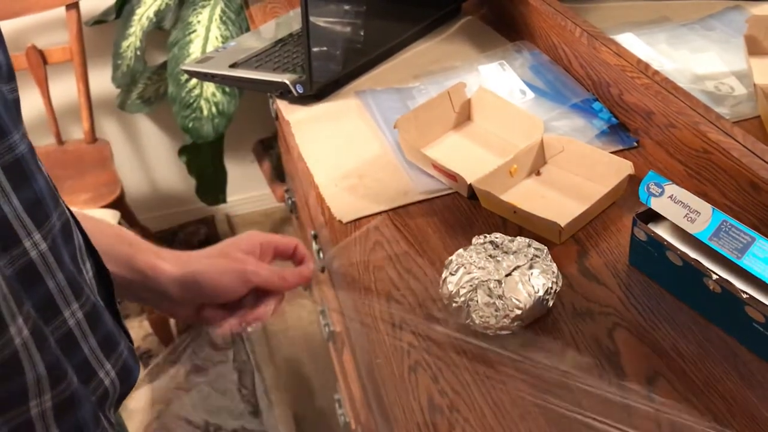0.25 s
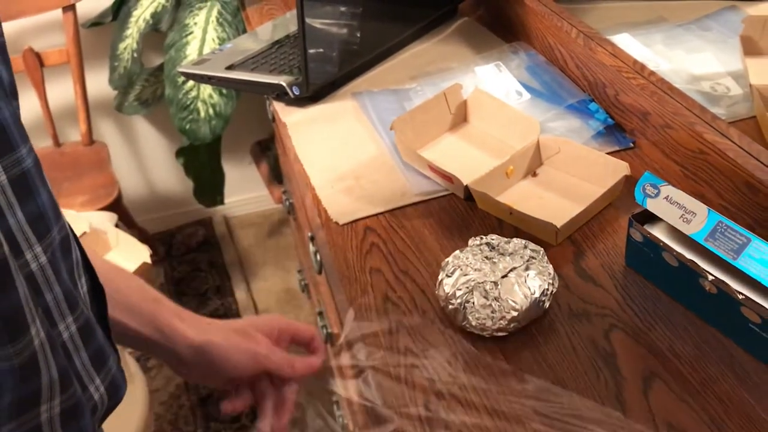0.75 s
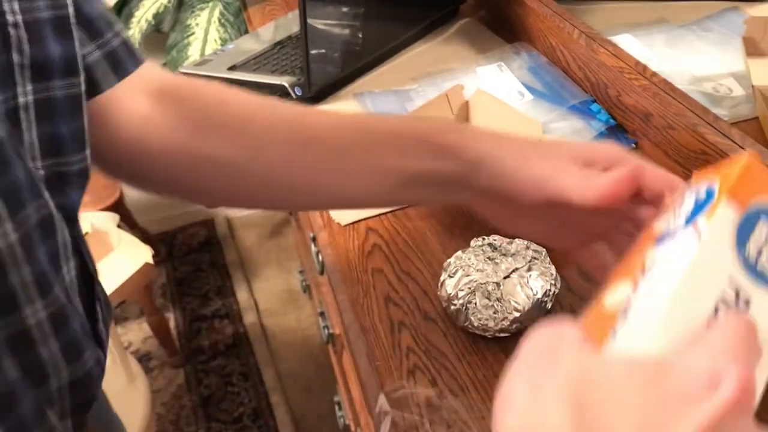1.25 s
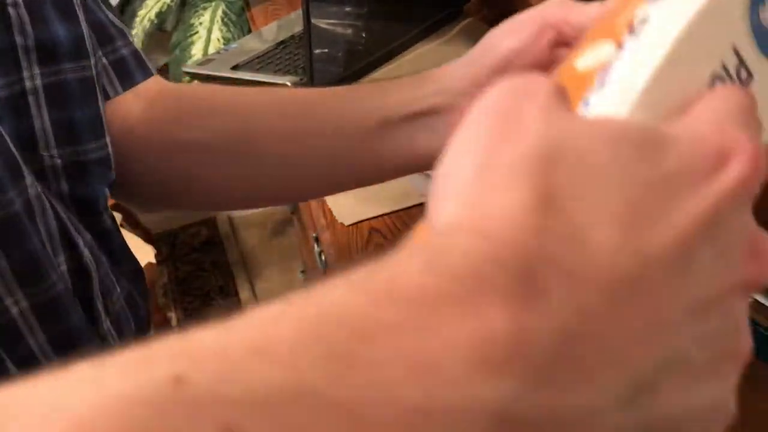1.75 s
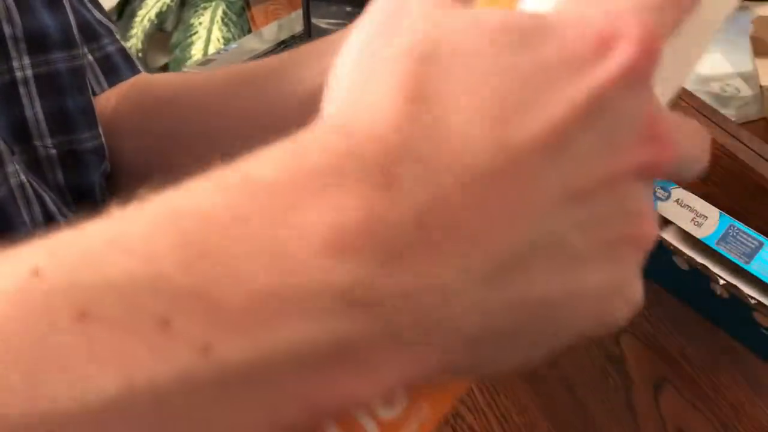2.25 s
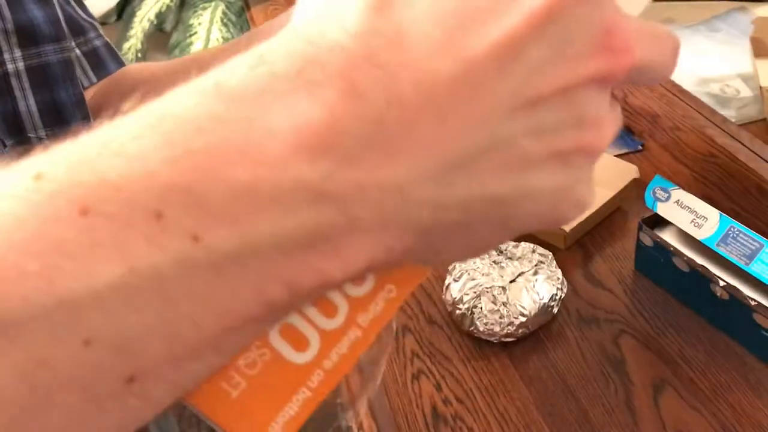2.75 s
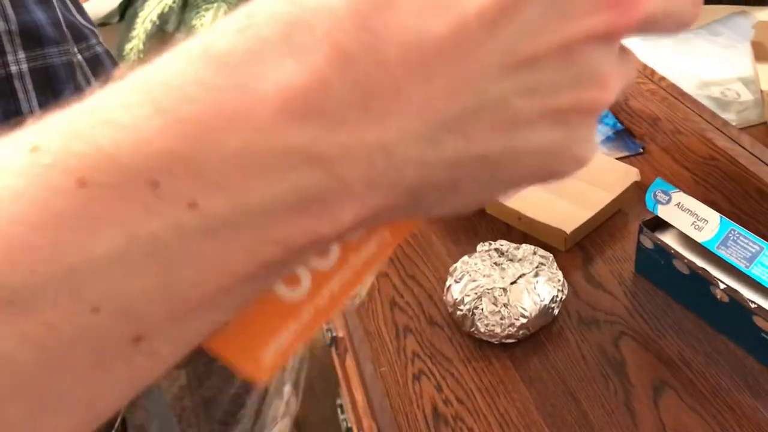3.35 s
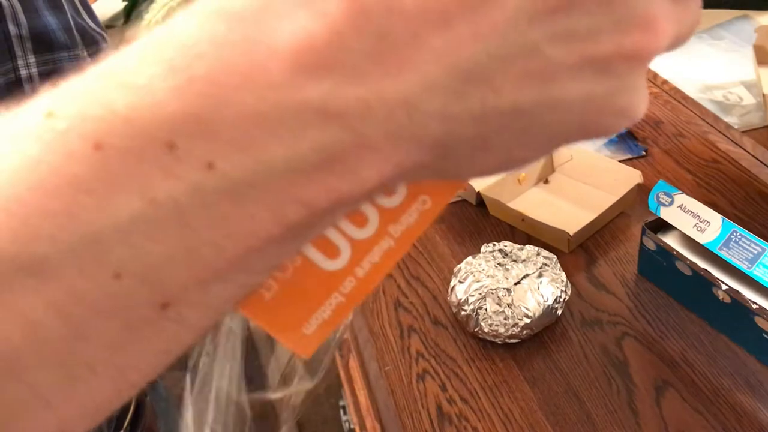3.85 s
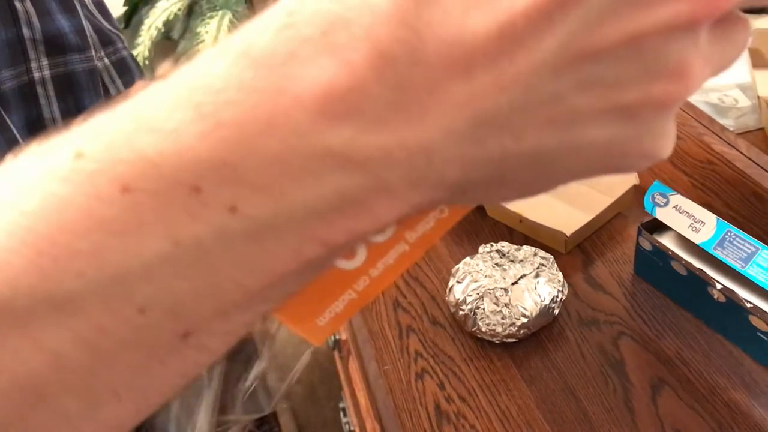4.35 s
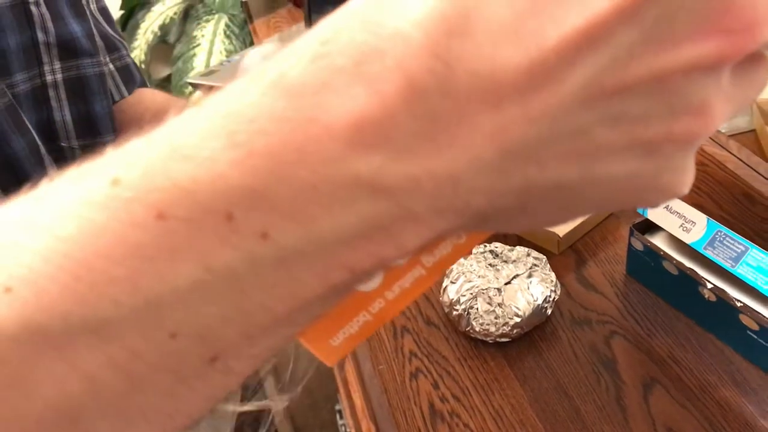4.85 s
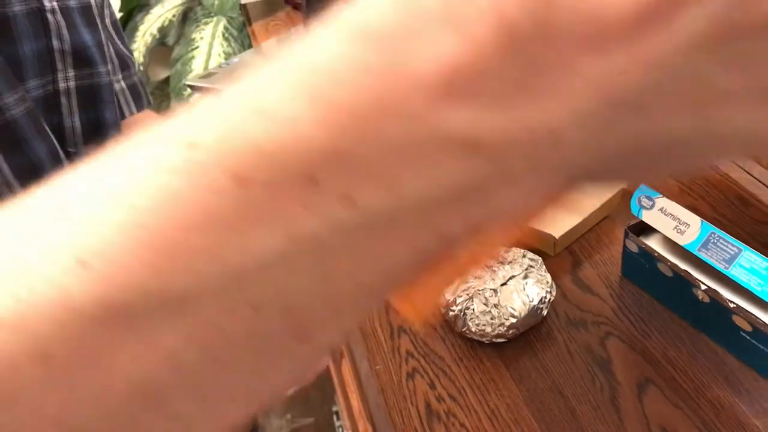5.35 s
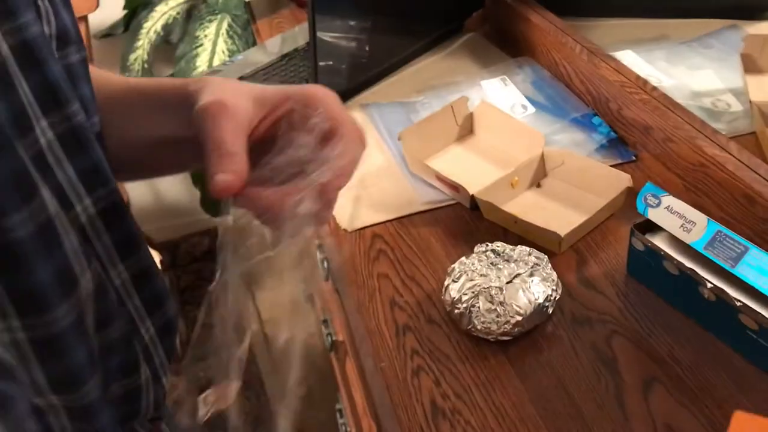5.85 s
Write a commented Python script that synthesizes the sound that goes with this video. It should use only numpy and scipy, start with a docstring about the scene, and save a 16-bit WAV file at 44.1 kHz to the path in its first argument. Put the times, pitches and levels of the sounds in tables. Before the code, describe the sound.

In a quiet room with little echo, a light cardboard knock leads into faint crackling of plastic wrap, heard close up. A handful of brief rips follow as the wrap is pulled across the teeth of its box, with crisp ticks and snaps between them. Last and loudest come a sharp knock and a quick clatter of the box on a wooden table, over a faint low rumble.

```python
"""Tearing cling film from its box

Close by in a furnished room, cling film is drawn from a cardboard box and torn along the toothed edge
in short tugs. Tiny slips in the film make it rip, rustle and snap; the card panels and the air inside
ring along. The box is knocked on a wooden table, which booms. Mains hum lies under the room tone."""
import sys
import numpy as np
from scipy import signal
from scipy.fft import rfft, irfft, next_fast_len
from scipy.io import wavfile
from scipy.ndimage import uniform_filter1d, map_coordinates

SR = 44100
rng = np.random.default_rng(int(sys.argv[2]) if len(sys.argv) > 2 else 0)


def digitize_waveform(pressure):
    """Quantize a signal to 16-bit integers and store it at the path in sys.argv[1].

    Rows of a 2-D input are taken as channels; values are limited to [-1, 1].
    """
    field = np.atleast_2d(pressure).T
    bounded = np.clip(field, -1, 1)
    quanta = np.round(bounded * 32767).astype(np.int16)
    wavfile.write(sys.argv[1], SR, quanta)


N = 269010
TIME = np.arange(N) / SR


# Tugs along the teeth: (start [s], level [dB], attack [s], hold [s], box send [dB], hollow send [dB])
TUG_CUES = [(2.451, -35.5, 0.017, 0.036, -10, -12.5), (2.973, -38, 0.026, 0.031, -5, -22),
            (3.411, -43, 0.059, 0.033, -7.5, -20.5), (4.172, -35, 0.012, 0.013, -5.5, -13.5),
            (5.276, -44.5, 0.036, 0.0021, -0.5, 0)]

def tugs():
    """The teeth rip the film in a dense rattle of slips. Returns the box, film and hollow feeds."""
    swell_db, sag_db_per_s, release_db_per_s = 23.5, 94, 417
    slips = patchy(crackle(spread_db=3.5, clump_db=3.5, clumps_per_s=300), depth_db=1.0)
    feeds = np.zeros((3, N))
    for start, db, attack_s, hold_s, box_db, hollow_db in TUG_CUES:
        since_top = TIME - start - attack_s
        rip_db = db - swell_db * np.minimum(since_top / attack_s, 0) ** 2
        rip_db -= sag_db_per_s * np.clip(since_top, 0, hold_s)
        rip_db -= release_db_per_s * np.maximum(since_top - hold_s, 0)
        feeds += amp([[box_db], [0], [hollow_db]]) * amp(rip_db) * slips * (TIME >= start)
    return feeds


# Film snaps and box knocks: (time [s], box level [dB], focus [Hz], film level [dB], hollow level [dB])
SNAP_CUES = [(.007, -31.5, 1050, -44, -33), (.051, -35.5, 820, -49.5, -46), (.225, -48, 2570, -74, -51.5),
             (.395, -50.5, 1030, -70, -56), (.534, -56, 945, -50, -49), (.885, -42, 1100, -66, -58),
             (1.029, -56.5, 1180, -59, -53), (1.435, -55, 1260, -69, -77), (1.649, -55.5, 1110, -63, -68),
             (1.743, -58, 1130, -63, -79), (1.812, -39, 1020, -34, -35.5), (1.946, -59, 1800, -61, -68),
             (1.977, -49.5, 1340, -55, -53), (2.196, -56, 3010, -51, -62), (2.476, -52, 2430, -28.5, -65),
             (2.493, -45, 2480, -28.5, -54), (2.533, -51, 1230, -41, -73), (2.685, -71, 3250, -46.5, -76),
             (2.71, -39.5, 950, -52, -53), (2.799, -47.5, 800, -58, -60), (2.855, -55.5, 842, -52.5, -73),
             (2.992, -38.5, 2070, -53, -44), (3.031, -59, 2000, -40, -45), (3.144, -56, 3020, -63, -61),
             (3.163, -57, 2960, -46, -52.5), (3.319, -50.5, 1230, -76, -60), (3.422, -44.5, 1100, -47, -54),
             (3.438, -45, 1210, -42, -69), (3.456, -37, 1790, -52, -68), (3.633, -29, 1060, -66, -45.5),
             (3.775, -51, 1110, -49, -59), (3.854, -58, 3240, -46.5, -59), (3.977, -33.5, 2350, -38, -48),
             (4.214, -39, 1220, -35, -63), (4.258, -37, 1150, -32, -46), (4.546, -65, 2940, -54.5, -78),
             (5.276, -68, 2500, -40.5, -48.5), (5.292, -40, 1480, -62, -69), (5.31, -27.5, 810, -32.5, -32),
             (5.566, -54, 1300, -56, -70), (5.577, -48, 1680, -56, -49), (5.622, -19, 2070, -40, -32),
             (5.625, -23.5, 730, -36, -41), (5.794, -48.5, 1200, -54, -55), (5.801, -43, 970, -64, -53.5),
             (5.87, -56, 700, -73, -51.5), (5.929, -29, 1100, -56, -34), (5.934, -33, 1310, -47, -34.5),
             (5.9417, -16, 1200, -41, -29.5), (5.955, -26.5, 1070, -55, -29.5), (5.97, -33, 1140, -60, -48),
             (5.986, -35.5, 1020, -47.5, -41), (6.03, -39.5, 1050, -51, -43.5)]

def snaps():
    """Each snap is a dying burst of slips that favours the panels near the place it strikes."""
    size = 4096
    hits = bursts(decays_s=np.full(len(SNAP_CUES), 0.0031), size=size)
    f = np.fft.rfftfreq(size, 1 / SR)
    bodies = np.abs([*box_panels(f), film_colour(f), box_hollow(f)]) ** 2
    # trim each burst so that every body takes up the energy meant for it
    power = np.abs(rfft(hits)) ** 2
    trims = np.sqrt(power.mean(axis=1)[:, None] * bodies.sum(axis=1) / (power @ bodies.T))
    panel_hz = np.array(PANEL_MODES)[:, 0]
    feeds = np.zeros((len(bodies), N + size))
    for (start, box_db, focus_hz, film_db, hollow_db), hit, trim in zip(SNAP_CUES, hits, trims):
        reach_octaves = np.where(panel_hz < focus_hz, 1.25, 1.176)
        panels_db = box_db + focus_db(panel_hz, focus_hz, reach_octaves)
        gains = amp([*panels_db, film_db, hollow_db]) * trim
        feeds[:, round(start * SR):][:, :size] += gains[:, None] * hit
    return feeds[:-2, :N], feeds[-2, :N], feeds[-1, :N]


# Level ride of the hands creasing the film: (time [s], level [dB])
RUSTLE_RIDE = [(0, -60), (.11, -72), (.21, -62.5), (.3, -68), (.44, -65), (.51, -68), (.55, -66.5),
               (.66, -67), (.77, -73), (.87, -64), (.95, -70.5), (1.35, -74), (1.78, -88), (2.0, -70),
               (2.03, -58), (2.17, -72.5), (2.28, -66.5), (2.43, -70), (2.68, -55), (2.75, -70.5),
               (2.86, -60.5), (2.95, -62), (3.19, -54), (3.25, -66), (3.63, -56.5), (3.71, -69.5),
               (3.77, -60), (3.88, -56), (3.92, -66.5), (4.1, -71.5), (4.36, -55.5), (4.46, -66.5),
               (4.56, -65), (4.74, -76.5), (4.78, -59), (4.88, -64), (4.94, -53), (5.03, -67.5),
               (5.08, -62), (5.15, -67.5), (5.48, -64.5), (5.53, -58), (5.6, -56.5), (5.72, -63.5),
               (6.1, -64)]

def rustle():
    """Creases let go all the time; the box follows only in part. Returns box, film and hollow feeds."""
    film_db = np.interp(TIME, *np.transpose(RUSTLE_RIDE))
    box_db = -70.5 + 0.42 * (film_db + 65)
    hollow_db = box_db - 11
    slips = patchy(crackle(spread_db=1.0, clump_db=2.3, clumps_per_s=120), depth_db=5.5)
    return amp([box_db, film_db, hollow_db]) * slips


# Single creases that pop out of the rustle: (time [s], level [dB], pitch [Hz])
POP_CUES = [(0.1376, -48, 4190), (0.179, -43.5, 4500), (0.3473, -44.5, 12300), (0.4457, -47, 11800),
            (0.4648, -47, 5250), (0.54, -39.5, 12700), (0.5674, -47, 11600), (0.6459, -39.5, 12200),
            (0.6744, -51, 12000), (0.7726, -50.5, 12200), (0.8127, -51, 11900), (0.863, -45.5, 11200),
            (0.9207, -48.5, 6140), (1.3052, -49, 11600), (1.492, -46.5, 12200), (1.6162, -47, 5430),
            (1.9275, -47.5, 9050), (2.0211, -36.5, 12200), (2.0337, -34.5, 11500), (2.0621, -28.5, 10700),
            (2.0679, -33.5, 11900), (2.117, -49, 11800), (2.138, -35.5, 11800), (2.2624, -39.5, 9450),
            (2.361, -41.5, 12800), (2.8113, -43, 12100), (3.1047, -41, 9040), (3.19, -28.5, 10600),
            (3.3448, -45, 9560), (3.3932, -42.5, 12200), (3.6007, -47, 5870), (3.644, -31, 12600),
            (3.749, -45.5, 12300), (3.8851, -50, 5260), (4.1237, -34.5, 9500), (4.6144, -50, 11700),
            (4.838, -42, 11100), (4.8753, -42, 12000), (4.931, -40, 12200), (5.0818, -38, 12400),
            (5.1841, -40.5, 11900), (5.5257, -42, 11400), (5.584, -35, 11900), (5.8242, -43, 6420)]

def crease_pops():
    """A crease pops with a broad pitch of its own: small patches of film sound higher."""
    faint_count, size = 130, 1024
    # fainter pops are scattered at random and follow the rustle's level
    when, strength, pitch = rng.random((faint_count, 3)).T
    faint_s = when * N / SR
    faint_db = np.interp(faint_s, *np.transpose(RUSTLE_RIDE)) + 10 + 4.5 * (2 * strength - 1)
    faint_hz = 9100 * 2 ** (pitch - .5)
    cues = np.array([*POP_CUES, *zip(faint_s, faint_db, faint_hz)])
    decays_s = 0.00044 * 2 ** ((cues[:, 1] + 45) / 6.5)  # louder pops last longer
    f = np.fft.rfftfreq(size, 1 / SR)
    out = np.zeros(N + size)
    for (start, db, hz), burst in zip(cues, bursts(decays_s, size)):
        pop = irfft(rfft(burst) * ringing([(hz, .9 * hz, 0)], f)[0])
        out[round(start * SR):][:size] += amp(db) * pop / np.abs(pop).max()
    return out[:N]


# The bright EQ of the thin sheet: (frequency [Hz], gain [dB])
FILM_EQ = [(300, -48), (1000, 6), (2500, 7), (4500, 4.5), (6400, 7), (8000, 4), (10300, 4), (12000, 8.5),
           (14000, -0.5), (15700, -3.5)]

def film_colour(f):
    """The film's response is broad, so it adds no ring of its own."""
    return unit(amp(along(FILM_EQ, f)))


# Resonances of the cardboard panels: (pitch [Hz], gain [dB])
PANEL_MODES = [(560, 7), (680, 2), (780, 6), (920, 5), (1092, 7.5), (1222, 5), (1311, 7.5), (1560, -5),
               (1700, -24), (1950, 1.5), (2300, 4), (2700, 3), (3400, 2), (4400, -2)]

def box_panels(f):
    """Each panel rings, one response a row; the higher ones are damped faster."""
    return ringing([(hz, max(80, 70 * (hz / 1200) ** 2.4), db) for hz, db in PANEL_MODES], f)


# Low body of the air in the box and the table top: (pitch [Hz], width [Hz], gain [dB])
HOLLOW_MODES = [(240, 175, -11.5), (320.6, 30, 1), (383, 65, -6)]

def box_hollow(f):
    """The low resonances add up to one hollow response."""
    return ringing(HOLLOW_MODES, f).sum(axis=0)


# Jolts that reach the table: (time [s], level [dB], focus [Hz])
THUD_CUES = [(1.813, -50, 153), (2.458, -49, 94.2), (4.181, -42, 187), (5.623, -41.5, 102),
             (5.939, -52, 186), (5.987, -38, 170), (6.031, -39, 175)]
# Modes of the wooden top: (pitch [Hz], 60 dB decay [s])
TABLE_MODES = [(45, 0.015), (65, 0.042), (95, 0.095), (130, 0.075), (170, 0.11)]

def table_thuds():
    """Soft jolts set the table top booming, most in the modes near their focus."""
    age = np.arange(SR // 2) / SR
    attack = 1 - np.exp(-age / 0.0046)
    boom = np.zeros(N + len(age))
    for start, db, focus_hz in THUD_CUES:
        for hz, t60 in TABLE_MODES:
            level_db = db - 5 * np.log2(hz / focus_hz) ** 2 - 60 * age / t60
            boom[round(start * SR):][:len(age)] += amp(level_db) * np.sin(2 * np.pi * hz * age) * attack
    return boom[:N]


# The dark colour of a knock's ring-out: (frequency [Hz], gain [dB])
KNOCK_TAIL_EQ = [(18, -50), (30, -6), (170, -0.5), (295, -4), (364, 0), (666, -16.5), (822, -10),
                 (913, -14), (1280, -14), (8740, -33.5), (16000, -66)]

def knock_tail():
    """A knock from just before the start dies away, first fast, then slowly."""
    fade = amp(-32.5 - 60 * TIME / 0.17) + amp(-41.5 - 60 * TIME / 0.66)
    return fade * coloured_noise(KNOCK_TAIL_EQ)


# Short reverb of the furnished room: (frequency [Hz], 60 dB decay [s])
ROOM_DECAY = [(150, 0.31), (1000, 0.26), (4000, 0.24), (12000, 0.25)]

def room_reverb(x):
    """The room answers with a dying noise tail, drawn anew every quarter second."""
    step, predelay = SR // 4, 130  # samples
    out = np.zeros(N + SR)
    for start in range(0, N, step):
        hz, age, noise = signal.stft(rng.standard_normal(SR // 2), SR, nperseg=256)
        decay = amp(-60 * age / along(ROOM_DECAY, hz)[:, None])
        tail = signal.istft(noise * decay, SR, nperseg=256)[1]
        wet = signal.fftconvolve(x[start:start + step], tail / np.linalg.norm(tail))
        out[start + predelay:][:len(wet)] += wet
    return out[:N]


# Partials of the mains hum: (pitch [Hz], rms level [dB])
HUM_PARTIALS = [(59.2, -82.5), (118.4, -74), (177.6, -79.5)]

def mains_hum():
    """The mains hum low; each partial wavers in level on its own."""
    sway_db, sways_per_s = 2.1, 5
    hum = np.zeros(N)
    for hz, db in HUM_PARTIALS:
        sway = map_coordinates(rng.standard_normal(40), [sways_per_s * TIME], order=1)
        hum += np.sqrt(2) * amp(db + sway_db * sway) * np.sin(2 * np.pi * hz * TIME)
    return hum


# Colour of the background bed: (frequency [Hz], gain [dB])
ROOM_TONE_EQ = [(20, -56), (33, 4), (42, -6.5), (59, 5), (108, 0.5), (175, -3), (317, -6), (500, -12),
                (1160, -16.5), (2500, -23.5), (5000, -25.5), (7500, -30), (12500, -20.5), (16000, -33)]

def room_tone():
    """A steady low rumble with faint hiss on top."""
    return amp(-66) * coloured_noise(ROOM_TONE_EQ)


def crackle(spread_db, clump_db, clumps_per_s):
    """Tiny slips of unequal but bounded size that come in clumps, rms 1."""
    sizes = amp(spread_db * np.minimum(rng.exponential(size=N), 5))
    knots = rng.standard_normal(int(N / SR * 600))
    clumps = map_coordinates(knots, [TIME * clumps_per_s], order=1)
    return unit(rng.standard_normal(N) * sizes * amp(clump_db * clumps))


def patchy(x, depth_db):
    """Different parts of the sheet sound at once: the colour shifts in patches."""
    spectra = signal.stft(x, nperseg=256)[2]
    patches = uniform_filter1d(rng.standard_normal(spectra.shape), size=9, axis=0)
    patches = unit(uniform_filter1d(patches, size=8, axis=1))
    return unit(signal.istft(spectra * amp(depth_db * patches), nperseg=256)[1][:N])


def bursts(decays_s, size):
    """Noise bursts with a quick rise and a dying tail, one a row; longer ones carry more energy."""
    life = np.clip(decays_s, .0001, .03)[:, None]
    age = np.arange(size) / SR / life
    rows = rng.standard_normal(age.shape) * np.exp(-age) * (1 - np.exp(-6 * age))
    return rows / np.linalg.norm(rows, axis=1, keepdims=True) * np.sqrt(life * SR)


def ringing(modes, f):
    """One response a row for (Hz, width, dB) modes; together they pass white noise at unit gain."""
    rows = np.array([(-1) ** k * amp(db) * 1j * f * width / (hz * hz - f * f + 1j * f * width)
                     for k, (hz, width, db) in enumerate(modes)])
    return rows / np.sqrt(np.mean(np.abs(rows.sum(axis=0)) ** 2))


def radiated(x, low_hz, high_hz):
    """A small body radiates little below its lowest mode; soft card little above its highest."""
    return signal.sosfilt(signal.butter(2, [low_hz, high_hz], "bandpass", fs=SR, output="sos"), x)


def focus_db(hz, centre_hz, reach_octaves):
    """A bell curve, 6 dB down at its reach."""
    return -6 * (np.log2(hz / centre_hz) / reach_octaves) ** 2


def coloured_noise(eq):
    """Noise through an EQ curve, rms 1."""
    return unit(filtered(rng.standard_normal(N), lambda f: amp(along(eq, f))))


def filtered(x, response):
    """x through a complex frequency response."""
    size = next_fast_len(N + SR // 2)
    return irfft(rfft(x, size) * response(np.fft.rfftfreq(size, 1 / SR)), size)[..., :N]


def along(points, hz):
    """Reads a (Hz, value) curve on a log axis."""
    point_hz, values = np.transpose(points)
    return np.interp(np.log(hz + 1), np.log(point_hz + 1), values)


def amp(db):
    """Gain of a level."""
    return 10 ** (np.asarray(db) / 20)


def unit(x):
    """Scaled to rms 1."""
    return x / np.sqrt(np.mean(x ** 2) + 1e-20)


def scene():
    """The mono mix: slips sound through box, hollow and film, then the room, over a quiet bed."""
    box, film, hollow = rustle() + tugs()
    box_snaps, film_snaps, hollow_snaps = snaps()
    # the small panels by the toothed edge take most of the rustle and the rips
    edge_db = focus_db(np.array(PANEL_MODES)[:, :1], centre_hz=1900, reach_octaves=1.3)
    box = amp(edge_db) * box + box_snaps
    # film and box share the moments of the slips, not their waveform
    film = (film + film_snaps) * rng.choice([-1, 1], N)
    close = radiated(filtered(box, box_panels).sum(axis=0), low_hz=404, high_hz=6340)
    close += radiated(filtered(hollow + hollow_snaps, box_hollow), low_hz=206, high_hz=650)
    ring_out = knock_tail()
    close += filtered(film + crease_pops(), film_colour) + table_thuds()
    return (close + amp(-10.5) * room_reverb(close) + ring_out + room_tone() + mains_hum())[None]


def record(dry):
    """A brick-wall high cut takes off the very top."""
    return filtered(dry, lambda hz: hz < 15750)


dry = scene()
out = record(dry)
digitize_waveform(out)
```